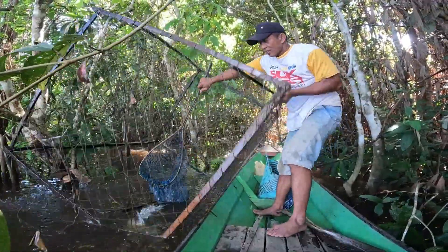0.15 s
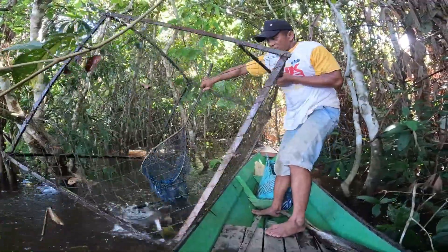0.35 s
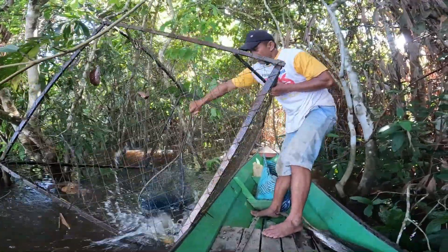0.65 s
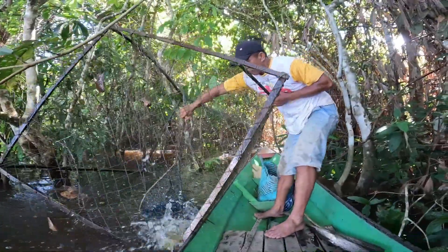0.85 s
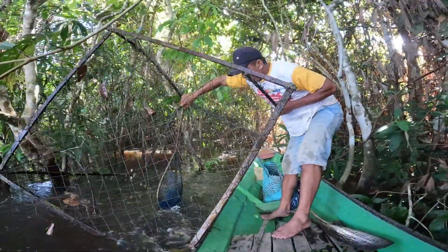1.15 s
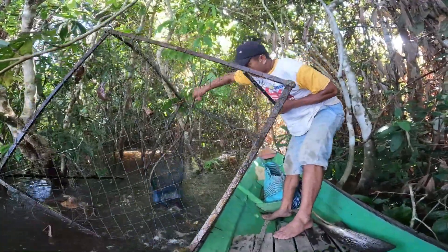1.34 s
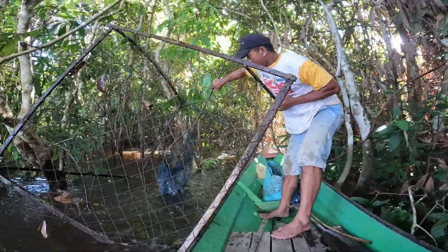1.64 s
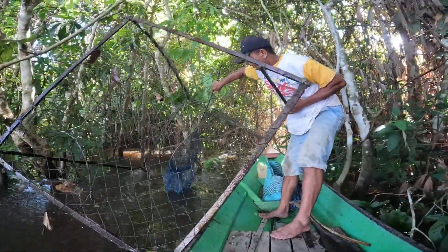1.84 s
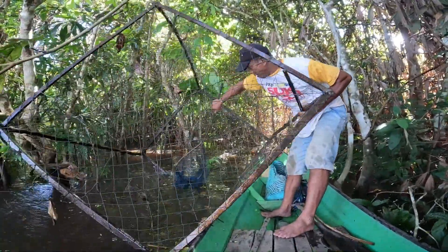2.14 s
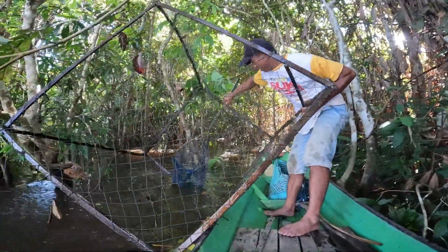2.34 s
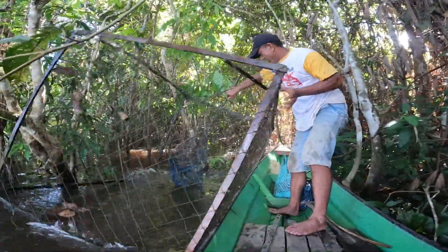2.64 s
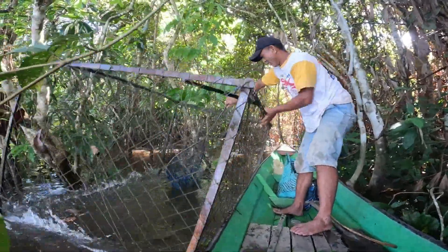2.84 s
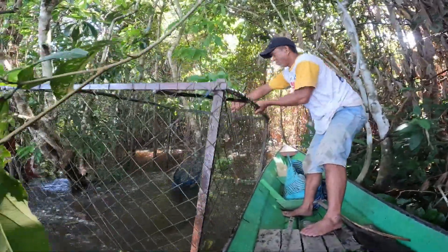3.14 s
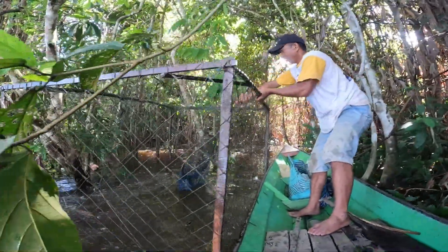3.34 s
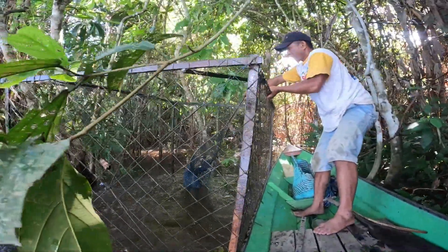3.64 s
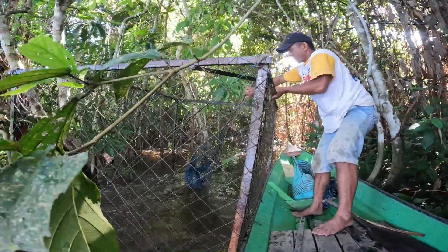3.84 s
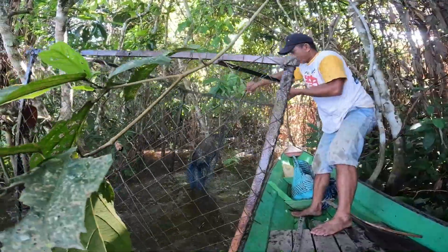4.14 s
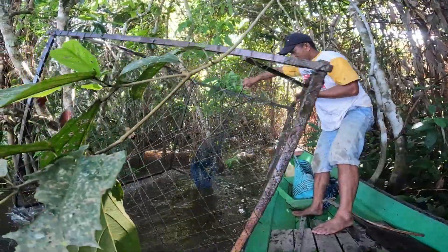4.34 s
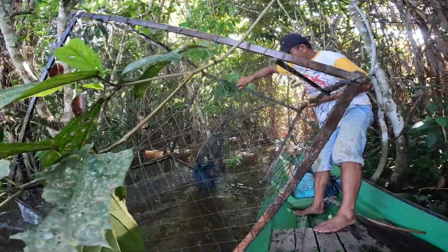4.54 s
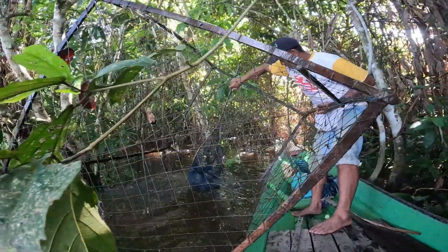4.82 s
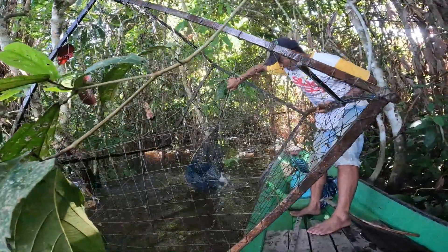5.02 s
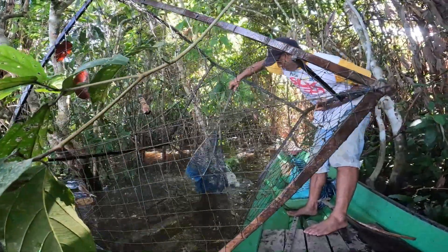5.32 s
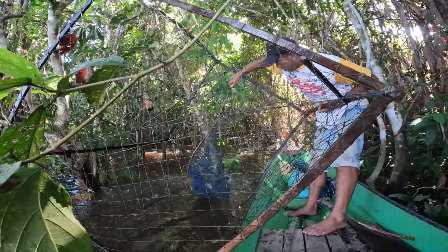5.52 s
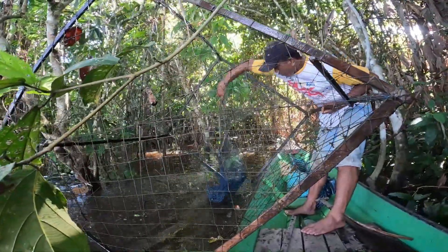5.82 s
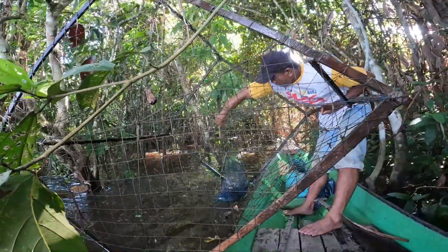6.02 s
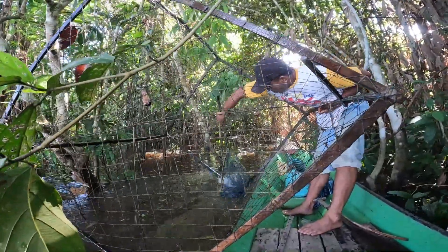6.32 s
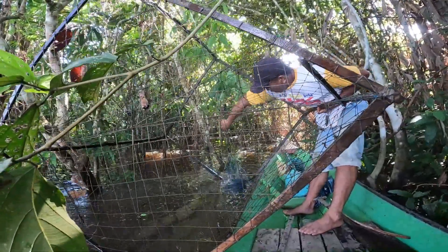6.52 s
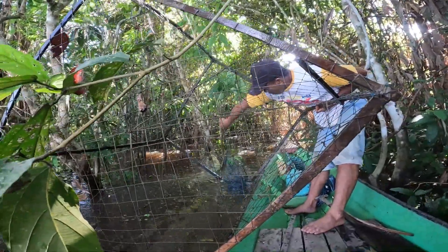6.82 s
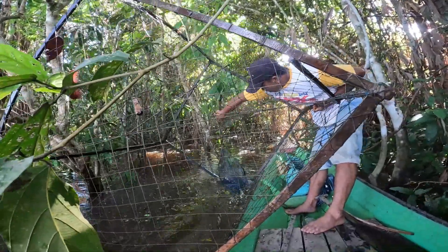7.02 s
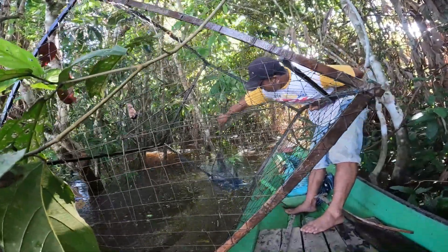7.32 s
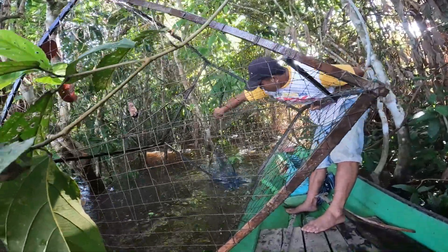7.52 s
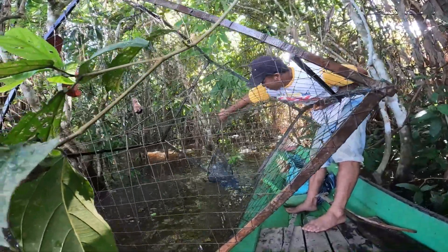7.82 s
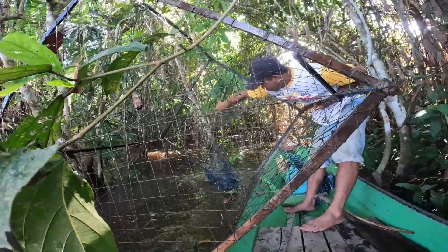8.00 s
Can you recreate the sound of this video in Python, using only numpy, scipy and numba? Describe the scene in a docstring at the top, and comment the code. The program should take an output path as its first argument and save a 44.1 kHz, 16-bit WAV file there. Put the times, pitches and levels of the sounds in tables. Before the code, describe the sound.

A close outdoor stereo scene beside a wooden canoe among trees. A low engine putters about nineteen times a second throughout, quiet and central, under a very faint hiss of leaves and insects. At 0.3 s plops and slaps begin; at 0.5 s the loudest sound, a hollow wooden clack with a hull thud, then dense splashing and bubbling to 1.3 s. The water drains to a thin trickle, with dull plank thuds near 1.8, 1.9 and 2.0 s. A second surge swells from 2.7 s, peaking around 2.9-3.0 s with deep gulps and a wet slap. Wooden knocks follow at 3.4 and 3.6 s, then near quiet. A short gulp comes at 4.5 s. From 4.8 to 8 s rising plips, drips and trickles fall from the mesh, with small splashes near 5.4, 6.1, 6.6, 7.3 and 7.9 s.

```python
"""Net trap beside a canoe

A framed net trap is swung and hauled through the water of a flooded forest: swarms of rising bubbles over
noise give running water, single bubbles and noise bursts give plops, gulps, drips and slaps.
The frame knocks on the hull (damped plank modes); a single-cylinder engine throbs low (filtered firing
pulses and gas noise). Leaves and insects hiss faintly, and the trunks scatter a faint noise-tail echo."""
import sys
import numpy as np
from scipy import signal
from scipy.fft import rfft, irfft
from scipy.io import wavfile
from scipy.ndimage import uniform_filter1d
from numba import njit

SR = 44100
rng = np.random.default_rng(int(sys.argv[2]) if len(sys.argv) > 2 else 0)


def materialize(psi):
    """Save the field psi as 16-bit PCM at rate SR to the path in sys.argv[1].

    A 1-D psi becomes a single channel; in a 2-D psi each row is a channel.
    """
    bounded = np.clip(np.atleast_2d(psi).T, -1, 1)
    quanta = np.round(bounded * 32767).astype(np.int16)
    wavfile.write(sys.argv[1], SR, quanta)


N = 359856
T = np.arange(N) / SR
TOP_HZ = 15700


def undb(db):
    """Decibels to gain."""
    return 10 ** (np.asarray(db) / 20)


def unit(x):
    """Scale to rms 1."""
    return x / np.sqrt(np.mean(x ** 2))


def curves(table):
    """Interpolate each column of a timed table, sample by sample."""
    s, *columns = np.transpose(table)
    return [np.interp(T, s, c) for c in columns]


def add(out, s, sound):
    """Mix a short sound in at time s."""
    i = max(int(s * SR), 0)
    out[i:i + len(sound)] += sound[:max(N - i, 0)]


def colour(x, points, size=8192):
    """Causal minimum-phase filter through (hz, db) points, built from the cepstrum."""
    hz, db = np.transpose(points)
    f = np.maximum(np.arange(size // 2 + 1) * SR / size, 1)
    gain = undb(np.interp(np.log(f), np.log(hz), db))
    cep = irfft(np.log(gain))
    cep[1:size // 2] *= 2
    cep[size // 2 + 1:] = 0
    impulse = irfft(np.exp(rfft(cep)))
    return signal.fftconvolve(x, impulse)[:len(x)]


def band(x, low_hz, high_hz):
    """Second-order high-pass and low-pass."""
    for hz, kind in ((low_hz, "high"), (high_hz, "low")):
        sos = signal.butter(2, min(hz, SR / 2 - 1000), kind, fs=SR, output="sos")
        x = signal.sosfilt(sos, x)
    return x


def fade(t, t60):
    """Exponential decay by 60 dB in t60 seconds."""
    return np.exp(-np.log(1000) * t / t60)


def even(x, span_s):
    """Hold the rms near 1 over span_s, leaving faster detail alone."""
    span = int(span_s * SR)
    power = uniform_filter1d(uniform_filter1d(x ** 2, span), span)
    return x / np.sqrt(power + 1e-9)


def forest():
    """A faint hiss of leaves and distant insects: coloured noise."""
    # forest air: hz, density_db_per_hz
    air_colour = [(100, 23), (500, 15.5), (800, -60), (1400, 10), (2400, -16), (4000, 1), (7000, 1),
                  (8500, -7.5), (12000, -7.5), (15000, -45)]
    return undb(-53.5) * unit(colour(rng.standard_normal(N), air_colour))


def engine(first_turn=.44, jitter_s=0.0014, scatter_db=2.5, puff_turns=0.89):
    """Uneven firings thump the exhaust and puff rumbling gas; the flywheel keeps the effort steady."""
    # idling: start_s, firings_per_s, level_db
    idle = [(0, 19.1, -25), (1, 19.46, -27), (5.5, 19.4, -27.5), (6.2, 19, -28.5), (6.9, 19.6, -28),
            (7.5, 19.2, -30.5), (8.16, 20.1, -28.5)]
    # exhaust and hull response to a firing: hz, db
    exhaust = [(8, -68), (20, -15.5), (40, -11.5), (60, -6), (80, -1), (100, 0), (130, 0), (150, -7),
               (170, -13), (225, -9), (260, -16), (300, -23), (400, -30), (600, -67.5), (8000, -125)]
    firing_hz, level_db = curves(idle)
    turns = first_turn + np.cumsum(firing_hz) / SR  # one turn per firing
    firings_s = T[1:][np.diff(np.floor(turns)) > 0]
    thumps = np.zeros(N)
    for s, (late, size) in zip(firings_s, rng.standard_normal((len(firings_s), 2))):
        add(thumps, s + jitter_s * late, -undb([scatter_db * size]))
    puffs = np.exp(-((turns + .15) % 1) / puff_turns) + .22
    gas = rng.standard_normal(N) * puffs
    throb = colour(unit(thumps) + undb(4.0) * unit(gas), exhaust)
    return even(throb, span_s=0.083) * undb(level_db)


def scatter(x, t60):
    """Dense reflections that die away in t60, with the energy of the sound itself."""
    t = np.arange(int(t60 * SR)) / SR
    echoes = rng.standard_normal(len(t)) * fade(t, t60)
    return signal.fftconvolve(x, echoes / np.linalg.norm(echoes))[:N]


def spatter(per_s=60, t60=0.054, spread_db=1.0, steady=1.7):
    """Water leaves the mesh in clumps: sudden surges that die away, on a steady run; mean 1."""
    t = np.arange(SR // 4) / SR
    chance, strength = rng.random(N), rng.exponential(size=N)
    clumps = (chance < per_s / SR) * undb(spread_db * np.minimum(strength, 3))
    surges = np.abs(signal.fftconvolve(clumps, fade(t, t60))[:N])
    return (steady + surges / surges.mean()) / (steady + 1)


def flow():
    """Gurgle, splash and spray levels in dB: splashes swell, hold, drop and drain, over the trickle."""
    # steady trickle off the mesh: time_s, level_db
    trickle = [(0.01, -63), (1.44, -48), (1.83, -56.5), (2.33, -54), (2.38, -78), (3.53, -50), (3.89, -77),
               (4.09, -55.5), (4.19, -73), (4.99, -52), (5.83, -49.5), (6.37, -50.5), (6.93, -53.5),
               (7.6, -52.5), (7.66, -101), (8.04, -57), (8.15, -55.5)]
    # net stirs or sheds water: crest_s, level_db, swell_s, hold_s, depth_db (+ gurgles, - sprays)
    splashes = [(0.021, -45.5, 0.97, 0.073, 15), (0.413, -33, 0.043, 0.0065, -0.5),
                (0.707, -36.5, 0.62, 0.11, 2.5), (0.788, -34, 0.011, 0.015, 5.5),
                (0.887, -34, 0.16, 0.098, 4.5), (1.064, -37.5, 0.078, 0.065, 1.5),
                (1.212, -36, 0.07, 0.023, 3), (2.76, -35.5, 0.26, 0.11, -2), (2.886, -31, 0.29, 0.11, 5),
                (3.141, -42.5, 0.21, 0.23, 0.5), (3.69, -63, 0.11, 0.12, 16.5),
                (4.496, -43.5, 0.048, 0.037, 3.5), (4.63, -47.5, 0.47, 0.21, -5.5),
                (5.123, -48, 0.014, 0.11, 3.5), (5.354, -43.5, 0.14, 0.061, 5),
                (5.551, -45, 0.86, 0.084, 1.5), (6.08, -36, 0.075, 0.053, 4), (6.471, -45, 0.018, 0.12, -1),
                (6.627, -38.5, 0.015, 0.013, 0.5), (6.97, -55.5, 0.045, 0.0038, 8.5),
                (7.137, -43.5, 0.047, 0.0062, 1.5), (7.325, -41, 0.18, 0.009, 1),
                (7.39, -44, 0.09, 0.059, 0), (7.904, -46.5, 0.14, 0.1, 2)]
    trickle_depth_db = -2
    release_s = 0.095  # time to drop 20 dB; swell_s is the time to rise 20 dB
    runoff_db, runoff_s = -12.5, 0.53  # wet mesh drains: level against the splash, time to drop 20 dB
    gurgle_db, spray_db = -3.5, -2.5  # against the splash level, at depth 0 dB
    spray_loss = 0.42  # dB of spray lost per dB of depth
    sources = [(undb(curves(trickle)[0]), trickle_depth_db)]
    for s, db, swell_s, hold_s, depth_db in splashes:
        before_s, after_s = np.maximum(s - T, 0), np.maximum(T - s - hold_s, 0)
        release_db = np.maximum(-20 * after_s / release_s, runoff_db - 20 * after_s / runoff_s)
        level_db = db - 20 * before_s / swell_s + release_db
        sources.append((undb(np.maximum(level_db, -120)), depth_db))
    gurgle = sum((gain * undb(gurgle_db + depth_db)) ** 2 for gain, depth_db in sources)
    splash = sum(gain ** 2 for gain, _ in sources)
    spray = sum((gain * undb(spray_db - spray_loss * depth_db)) ** 2 for gain, depth_db in sources)
    return 10 * np.log10([gurgle, splash, spray])


@njit
def bubbles(start, hz, cycles, rise, size):
    """Damped sines that climb in pitch by a share, rise, as each bubble nears the surface."""
    out = np.zeros(N)
    for k in range(len(start)):
        n, phase = int(cycles[k] * SR / hz[k]), 0.
        for i in range(min(n, N - start[k])):
            phase += 2 * np.pi * min(hz[k] * (1 + rise[k] * i / n), .45 * SR) / SR
            envelope = np.exp(-6. * i / n) - np.exp(-80. * i / n)
            out[start[k] + i] += size[k] * envelope * np.sin(phase)
    return out


def swarm(level_db, surges, shape, per_s, low_hz, high_hz, cycles, spread_db, wash_db, count=30000):
    """Bubbles over a fine wash; drips stand out in a moderate flow, blur in a rush or faint trickle."""
    max_rise = 0.33  # share of a bubble's pitch
    when, keep, pitch, life, climb, strength = rng.random((count, 6)).T
    start = (when * N).astype(int)
    rate = undb(.7 * (level_db - level_db.mean()))
    crowd = rate + 1 / rate  # least, 2, at the mean level; multiplies per_s
    on = keep < per_s * (crowd * surges)[start] * N / SR / count
    size = undb(spread_db * np.minimum(-np.log(1 - strength), 3.5)) / np.sqrt(crowd[start])
    hz = low_hz * (high_hz / low_hz) ** pitch
    lives = cycles * 2 ** (3 * life - 1.5)
    grains = bubbles(start[on], hz[on], lives[on], max_rise * climb[on], size[on])
    noise = unit(colour(rng.standard_normal(N), shape))
    wash = undb(wash_db) * np.sqrt(crowd) * surges * noise
    return even(unit(colour(grains, shape)) + wash, span_s=0.43) * undb(level_db)


def water(levels_db, surges):
    """Large bubbles gurgle, small ones splash, and droplets crackle on top; all surge together."""
    # colours of large, small and finest water grains: hz, db
    gurgle_colour = [(120, -13.5), (230, 10), (450, -6.5), (700, -4), (1100, 2), (1500, -13.5), (2200, -9),
                     (5000, -55)]
    splash_colour = [(600, -37), (1200, -3.5), (1700, -3.5), (3000, -3), (4000, -10.5), (6000, -21),
                     (12000, -46)]
    spray_colour = [(1500, -43), (3200, 1.5), (4300, 1), (7200, -0.5), (8500, -8.5), (10500, -6),
                    (12500, -10.5), (14000, -19), (15500, -53)]
    gurgle_db, splash_db, spray_db = levels_db
    gurgle = swarm(gurgle_db, np.sqrt(surges), gurgle_colour, per_s=100, low_hz=442, high_hz=1607,
                   cycles=22, spread_db=2.5, wash_db=-8)
    splash = swarm(splash_db, surges, splash_colour, per_s=190, low_hz=1200, high_hz=4200,
                   cycles=26, spread_db=4, wash_db=-7.5)
    spray = swarm(spray_db, surges, spray_colour, per_s=250, low_hz=3535, high_hz=12740,
                  cycles=12, spread_db=7, wash_db=-3)
    return gurgle + splash + spray


def plop(hz, rise, t60):
    """A big drop traps a bubble that swells, rings and rises; the crater rustles with it. Peak 1."""
    crater_share = .3
    swell_s = 0.58 * t60 ** 2  # long-lived bubbles start more softly
    t = np.arange(SR // 5) / SR
    pitch_hz = hz * (1 + rise * np.minimum(t / t60, 1))
    edges_hz = [0.68 * hz, min(1.214 * hz * (1 + abs(rise) / 2), TOP_HZ)]
    cavity = signal.butter(2, edges_hz, "band", fs=SR, output="sos")
    crater = unit(signal.sosfilt(cavity, rng.standard_normal(len(t)))) * fade(t, 0.063)
    swell = 1 - np.exp(-t / swell_s)
    tone = np.sin(2 * np.pi * np.cumsum(pitch_hz) / SR) * fade(t, t60)
    ring = (tone + crater_share * crater) * swell ** 2
    ring = signal.sosfilt(cavity, ring)  # the cavity radiates only near its own pitch
    return ring / np.abs(ring).max()


def slap(hz, patter_db):
    """A drop hits the surface: one spike, a broad crack and a short patter behind it. Peak 1."""
    crack_t60_s, patter_t60_s, spike = .012, 0.077, 4
    t = np.arange(SR // 8) / SR
    envelope = fade(t, crack_t60_s) + undb(patter_db) * fade(t, patter_t60_s)
    burst = rng.standard_normal(len(t)) * envelope
    burst[0] += spike
    burst = band(burst, 0.39 * hz, 0.94 * hz)
    return burst / np.abs(burst).max()


def drips(water_db):
    """Drops spatter at random off the running net, mostly small; off the raised net some trap a bubble."""
    tries_per_s, min_flow_db = 44, -52  # tries in a weaker flow make no drop
    peak_db, spread_db = 10, 6.5  # against the running water
    slap_low_hz, slap_high_hz, patter_db = 2220, 7060, -16
    raised_s, plip_share = 4.7, .35
    plip_low_hz, plip_high_hz, plip_t60_s = 650, 2200, .032  # t60 varies from half to double
    out = np.zeros(N)
    for when, pitch, strength, trap, life in rng.random((int(tries_per_s * T[-1]), 5)):
        s, running_db = when * T[-1], water_db[int(when * N)]
        if running_db < min_flow_db:
            continue
        if s > raised_s and trap < plip_share:
            hz = plip_low_hz * (plip_high_hz / plip_low_hz) ** pitch
            drop = plop(hz, 2 * trap, plip_t60_s * 2 ** (2 * life - 1))
        else:
            drop = slap(slap_low_hz * (slap_high_hz / slap_low_hz) ** pitch, patter_db)
        drop_db = running_db + peak_db + spread_db * (2 * strength ** 2 - 1)
        add(out, s, undb(drop_db) * drop)
    return out


def gulps(count=18, cycles=24, growth_db=9, scatter_octaves=0.237):
    """Water closes behind the frame in quick runs of ever louder bubbles, pitch drifting up or down."""
    # gulps: start_s, end_s, peak_db, first_hz, last_hz
    gulp_runs = [(0.564, 0.583, -21, 880, 1590), (2.858, 2.94, -18.5, 1010, 1140),
                 (2.971, 3.03, -22.5, 910, 1410), (2.914, 3.04, -20.5, 265, 220.4),
                 (4.439, 4.508, -25, 1910, 840), (6.474, 6.514, -35, 1100, 1890),
                 (7.358, 7.418, -30, 780, 1400), (7.951, 7.994, -29, 1040, 855)]
    out = np.zeros(N)
    for start_s, end_s, db, first_hz, last_hz in gulp_runs:
        along = (np.arange(count) + rng.random(count)) / count
        start = ((start_s + (end_s - start_s) * along) * SR).astype(int)
        detune = 2 ** (scatter_octaves * rng.standard_normal(count))
        hz = first_hz * (last_hz / first_hz) ** along * detune
        run = bubbles(start, hz, np.full(count, float(cycles)), np.zeros(count), undb(growth_db * along))
        run = band(run, hz.min(), hz.max())
        out += undb(db) * run / np.abs(run).max()
    return out


def plops():
    """The largest bubbles, ringing one by one."""
    # single bubbles: start_s, peak_db, start_pitch_hz, rise (share of that pitch over t60), t60_s
    big_bubbles = [(0.3, -13, 1430, 0.21, 0.024), (0.321, -21.5, 1060, 0.23, 0.05),
                   (0.384, -25, 1430, .1, 0.026), (0.703, -18.5, 1830, 0.26, 0.029),
                   (0.73, -19.5, 2400, .6, 0.018), (0.74, -27, 1710, 0.27, 0.034),
                   (0.783, -13, 3100, 0.089, 0.011), (0.793, -17.5, 546, 0.37, 0.028),
                   (0.81, -15, 2570, 0.76, 0.019), (0.887, -22, 450, 0.22, 0.038),
                   (0.905, -19.5, 620, 0.52, 0.053), (0.962, -31, 1100, 0.43, 0.027),
                   (1.215, -20, 1620, 0.33, 0.022), (1.293, -26.5, 2520, 0.36, 0.018),
                   (1.311, -30.5, 1010, 0.22, 0.063), (2.738, -22, 1087, 0.33, 0.029),
                   (2.904, -19.5, 934, 0.28, 0.052), (2.956, -15.5, 1300, .1, 0.041),
                   (3.121, -34, 1154, 0.15, 0.096), (3.234, -23, 2300, 0.25, 0.022),
                   (3.295, -36, 1510, .4, .05), (4.525, -27, 1176, 0.64, 0.056),
                   (4.812, -25, 422, 3.8, 0.11), (4.954, -32, 2370, 0.32, 0.028),
                   (5.048, -35.5, 930, 1.45, 0.062), (5.13, -28.5, 1410, 0.66, 0.044),
                   (5.194, -25.5, 1610, 1.1, 0.025), (5.293, -30, 1900, .4, 0.035),
                   (5.355, -16.5, 1336, 1.3, 0.02), (5.366, -19, 3110, .2, 0.02),
                   (5.403, -15.5, 2130, 1.4, 0.016), (5.54, -29.5, 1720, .4, 0.023),
                   (5.616, -27, 984, 0.34, 0.05), (5.621, -24, 1600, 0.35, 0.022),
                   (5.756, -17.5, 1640, 1.6, 0.018), (5.788, -30, 2550, 0.11, 0.033),
                   (6.08, -28, 670, 0.37, .06), (6.168, -21, 1440, 0.75, 0.015),
                   (6.629, -26.5, 1980, 0.59, 0.03), (6.664, -24, 1466, 0.52, 0.021),
                   (6.901, -35, 1890, 0.25, .035), (7.093, -28, 4400, .1, 0.0099),
                   (7.145, -27.5, 1120, 0.68, 0.018), (7.335, -24, 1170, 0.47, 0.023),
                   (7.716, -41.5, 1303, 0.13, 0.06), (7.883, -21, 690, 1.8, 0.024),
                   (7.938, -18.5, 750, 0.92, 0.02), (8.065, -29, 1476, 0.42, 0.042),
                   (8.117, -31, 1420, 1.1, 0.039)]
    out = np.zeros(N)
    for s, db, hz, rise, t60 in big_bubbles:
        add(out, s, undb(db) * plop(hz, rise, t60))
    return out


def slaps():
    """The heaviest drops and sheets of water slap the surface, one by one."""
    # slaps: start_s, peak_db, top_hz (the burst passes from 0.39 to 0.94 times this), patter_db (against the
    # crack)
    heavy_drops = [(0.2733, -15.5, 3220, 2), (0.665, -17.5, 4000, -4), (0.7175, -14.5, 5170, -16),
                   (0.7315, -13.5, 4800, -14), (0.7395, -24, 6000, -10), (0.784, -25, 3300, -9),
                   (0.792, -29, 3700, -11), (0.809, -15, 3000, -15), (0.964, -16, 3160, 0),
                   (1.2, -16, 5060, -11.5), (1.217, -18.5, 3630, -11), (1.4068, -21.5, 4320, 3),
                   (2.524, -26.5, 5300, 9), (2.739, -19, 4000, -8), (2.858, -23, 4010, -5),
                   (2.934, -25, 2200, -8), (3.026, -14.5, 2280, -2), (3.376, -24.5, 2870, 4),
                   (3.515, -34, 5340, -9), (3.5685, -28, 2900, -21), (4.954, -25.5, 2520, 7),
                   (5.3559, -17.5, 3900, -16), (5.403, -30, 3940, -21), (5.756, -29, 2600, -14),
                   (5.823, -33, 4000, -14), (5.8823, -23.5, 7250, 4.5), (6.0179, -26.5, 7740, 11),
                   (6.459, -30, 2800, 5), (6.63, -25, 3600, -4), (6.668, -23, 3200, -13),
                   (6.696, -25.5, 3020, -8), (6.706, -22, 5230, -8), (6.977, -30, 3030, -3),
                   (7.147, -26, 2600, -4), (7.331, -23.5, 3270, -5), (7.885, -25, 1930, 3),
                   (7.98, -24, 2760, 7)]
    out = np.zeros(N)
    for s, db, hz, patter_db in heavy_drops:
        add(out, s, undb(db) * slap(hz, patter_db))
    return out


def blow(hz, span, contact_s, t60, chatter_db):
    """A blow on wet planks: modes near hz ring out, sooner under the resting frame. Peak 1."""
    # plank modes of the canoe: pitch_hz, level_db
    hull_modes = [(125, 9.5), (180, 6.5), (240, 11.5), (315, 2.5), (430, -0.5), (560, -0.5), (742, -2.5),
                  (910, 2), (1110, 4.5), (1340, -9), (1560, -6), (2090, -15), (2650, -15)]
    t60_cycles = 45  # free ringing of each mode
    t = np.arange(SR // 3) / SR
    detune = 1 + .025 * rng.standard_normal(len(hull_modes))
    planks = np.zeros(len(t))
    for (f, db), d in zip(hull_modes, detune):
        planks += undb(db) * np.sin(2 * np.pi * f * d * t) * fade(t, t60_cycles / f)
    chatter = band(rng.standard_normal(len(t)), 160, 1380) * fade(t, t60)
    attack = 1 - np.exp(-t / contact_s)
    ring = attack * (unit(planks * fade(t, t60)) + undb(chatter_db) * unit(chatter))
    low_hz, high_hz = hz / max(span, 1), hz * max(span, 1)
    ring = band(band(ring, low_hz, high_hz), 0.45 * low_hz, 3.2 * high_hz)
    return ring / np.abs(ring).max()


def knocks():
    """The frame clacks and chatters on the planks; the hull thuds, and again as the frame settles."""
    # frame strikes the planks: start_s, peak_db, centre_hz, contact_s, t60_s
    clacks = [(0.5244, -5.5, 624, 0.0011, 0.078), (1.821, -25, 890, .0015, 0.043),
              (1.923, -23.5, 696, 0.0063, 0.093), (2.023, -26.5, 706, 0.0027, 0.081),
              (3.375, -17.5, 720, 0.013, 0.12), (3.451, -22.5, 850, .004, 0.035),
              (3.5676, -10, 990, 0.00042, 0.044)]
    # hull thuds: start_s, peak_db, centre_hz
    thuds = [(0.529, -7, 182), (1.831, -25.5, 330), (1.915, -11, 240), (2.028, -13, 233), (3.389, -14, 170),
             (3.574, -16, 368), (3.605, -14.5, 129)]
    out = np.zeros(N)
    for s, db, hz, contact_s, t60 in clacks:
        add(out, s, undb(db) * blow(hz, 1.4, contact_s, t60, chatter_db=-6))
    for s, db, hz in thuds:
        add(out, s, undb(db) * blow(hz, 1, contact_s=.004, t60=.17, chatter_db=-8.0))
    return out


def widen(x):
    """The side signal: a quarter cycle out of phase, and stronger towards the treble."""
    # stereo width: hz, side_minus_mid_db
    width = [(100, -34), (350, -18), (700, -15), (1400, -12.5), (2800, -10), (5600, -10), (10000, -6.5),
             (14000, -3)]
    hz, db = np.transpose(width)
    f = np.maximum(np.arange(N // 2 + 1) * SR / N, 1)
    gain = undb(np.interp(np.log(f), np.log(hz), db))
    return irfft(1j * gain * rfft(x), N)


def scene():
    """Water and knocks echo among the trunks; treble is wide and leans left, the engine is central."""
    # stereo balance: hz, left_minus_right_db
    lean = [(400, 0), (1300, 1), (2800, 1.5), (5600, 2), (9000, 2.4), (13000, 5)]
    rush_db = -35  # above this so many clumps overlap that the water runs smoothly
    levels_db, surges = flow(), spatter()
    surges = surges ** (1 / (1 + undb(levels_db[1] - rush_db) ** 2))
    hits = plops() + drips(levels_db[1]) + gulps() + slaps() + knocks()
    near = water(levels_db, surges) + hits
    echo = undb(-11) * scatter(band(near, 113, 12500), t60=0.32)
    mid = near + echo + engine() + forest()
    side = widen(water(levels_db, surges) + hits + forest())  # fresh draws of water and forest
    left = colour(mid + side, [(hz, db / 2) for hz, db in lean])
    right = colour(mid - side, [(hz, -db / 2) for hz, db in lean])
    return np.array([left, right])


def record(dry):
    """The recorder cuts the top: a steep low-pass at TOP_HZ."""
    return signal.sosfilt(signal.ellip(8, .2, 70, TOP_HZ, fs=SR, output="sos"), dry)


dry = scene()
out = record(dry)
materialize(out)
```